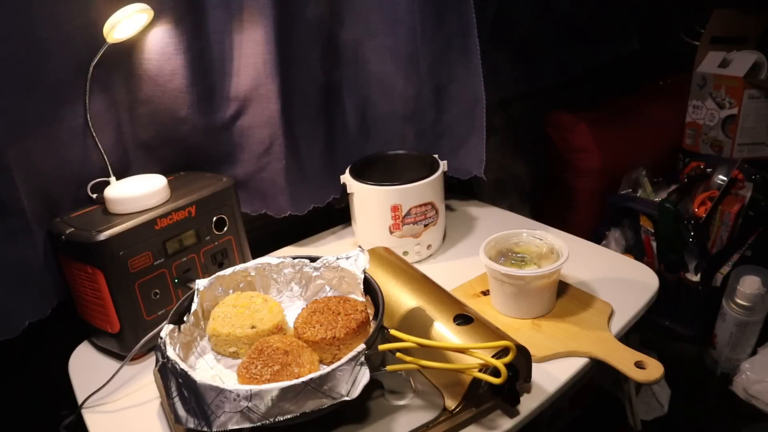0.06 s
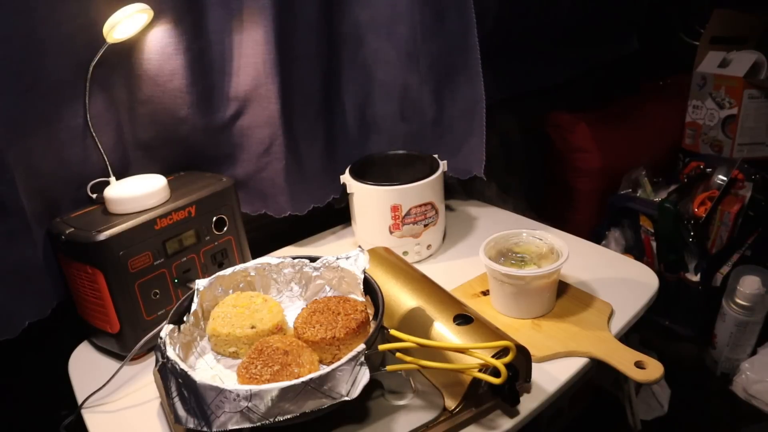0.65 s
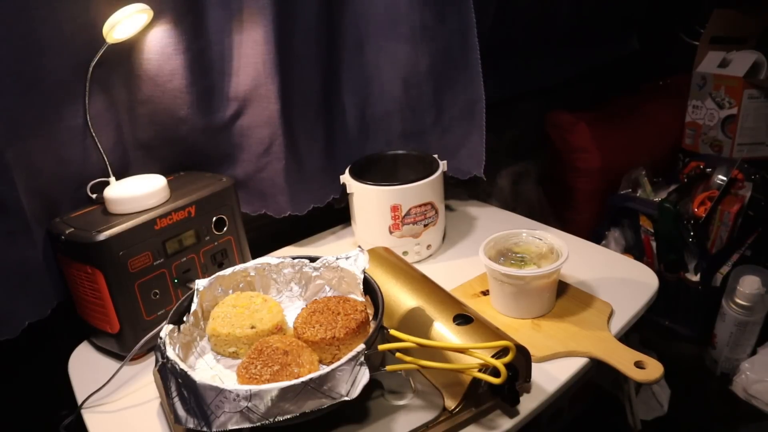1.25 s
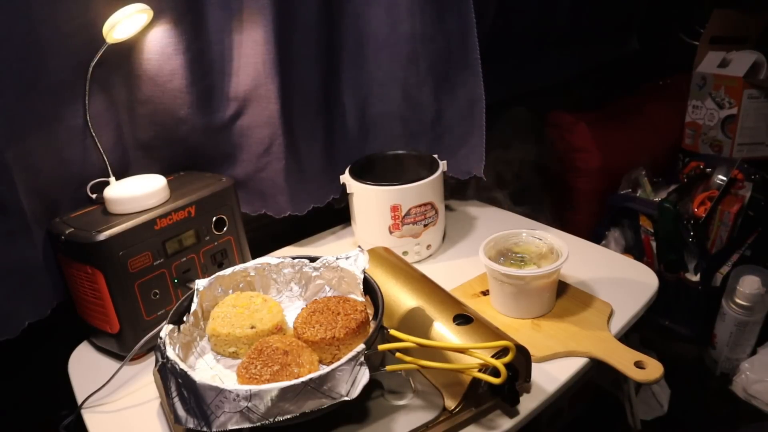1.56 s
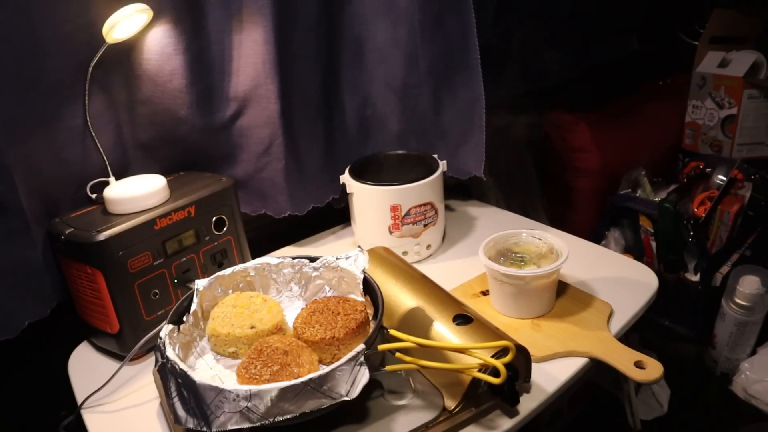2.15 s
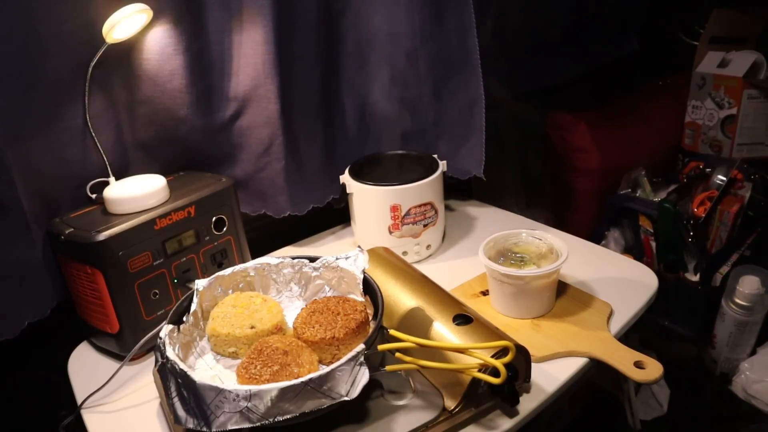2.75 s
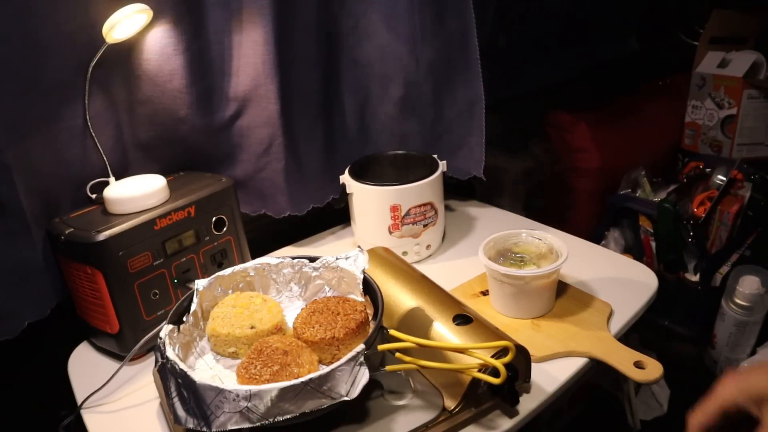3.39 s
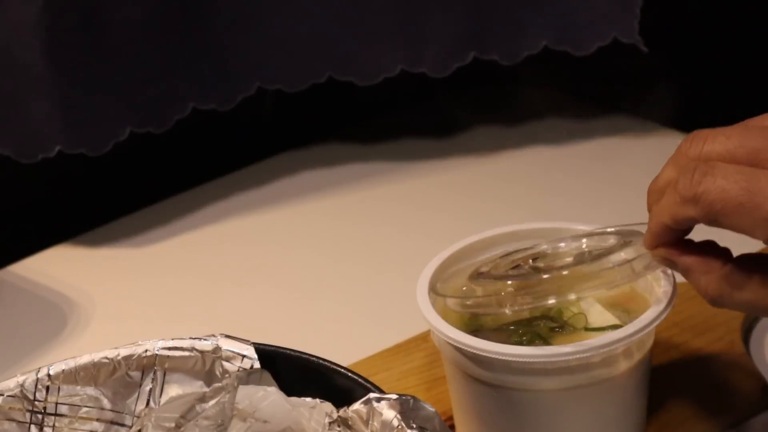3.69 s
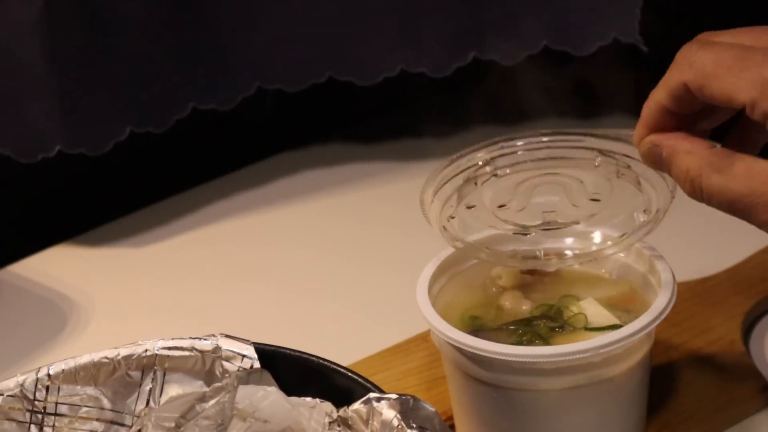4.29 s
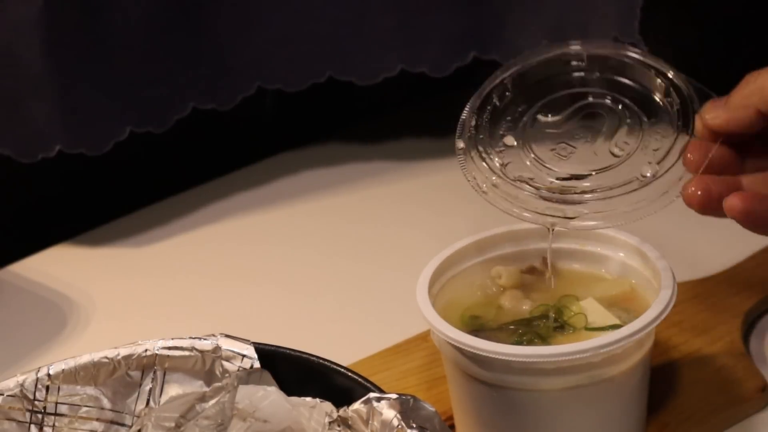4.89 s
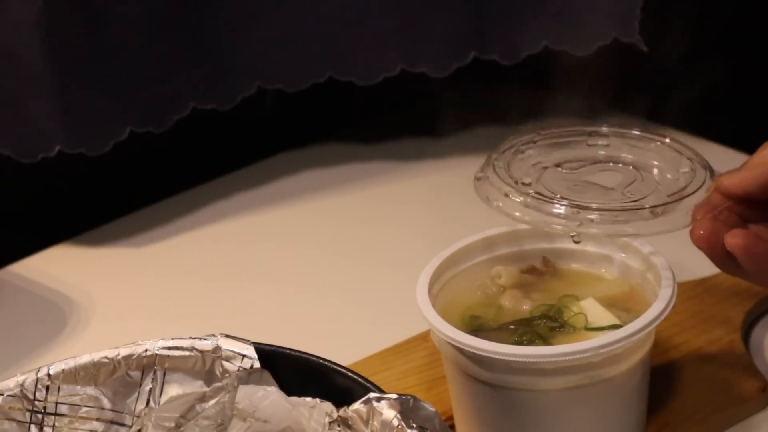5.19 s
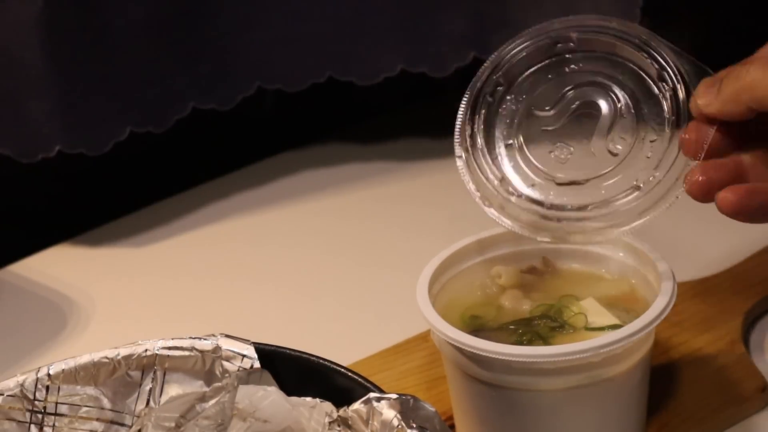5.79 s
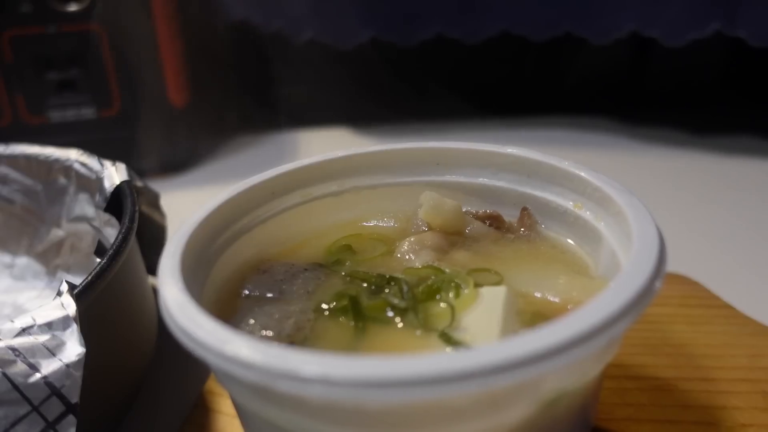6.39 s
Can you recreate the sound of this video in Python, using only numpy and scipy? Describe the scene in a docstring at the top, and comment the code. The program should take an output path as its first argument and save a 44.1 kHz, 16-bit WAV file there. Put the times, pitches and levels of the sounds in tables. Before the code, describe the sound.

A heater fan rumbles low and steady in a small padded camper cabin. Thin wrapping gives a brief crinkle at about 0.2 seconds, and a very faint, high whistle wavers in and out between 0.8 and 1.6 seconds. From 1.3 to 2.4 seconds the wrapping slides and crinkles with small bright ticks, and at 1.6 seconds something hollow knocks, a little to the right. At 3.5 seconds the fan cuts off abruptly, leaving soft hiss. Right away a thin plastic lid crackles as it is pried from a soup cup, and it crackles again at 3.9 seconds. At 4.5 seconds the lid flips with one sharp, close snap, by far the loudest sound, with a very short echo. A drop ticks faintly into the soup at 5 seconds. A hand brushes softly around 6.2 seconds, and the hiss turns much quieter at 6.4 seconds.

```python
"""Supper in a small camper cabin. First a heater fan rumbles while thin wrapping crinkles, a faint high whistle
comes and goes, and something hollow knocks. At 3.5 s the rumble is abruptly gone, and a plastic lid is pried
off a soup cup: its rim slips in two crackles, then its dome flips with one loud snap that makes a limiter turn
the sound down. A drop ticks into the soup, a hand brushes softly as it takes the lid aside, and for the last
moment the room's hiss is much quieter."""
import sys
import numpy as np
from scipy import signal
from scipy.fft import rfft, irfft
from scipy.io import wavfile
from scipy.ndimage import uniform_filter1d, minimum_filter1d

SR = 44100
rng = np.random.default_rng(int(sys.argv[2]) if len(sys.argv) > 2 else 0)


def unload_audio(sound):
    """Save the sound as a 16-bit wav file, at the path given as the first command line argument."""
    columns = np.transpose(np.atleast_2d(sound))
    # keep every value between -1 and 1, then stretch to whole-number steps
    steps = np.round(np.clip(columns, -1, 1) * 32767)
    wavfile.write(sys.argv[1], SR, steps.astype(np.int16))


N = 293088
RING = 13230  # samples in one short sound (0.3 s)
TIME = np.arange(N) / SR
AGE = TIME[:RING]  # seconds since a short sound began

# The lid's modes, the tones it rings with. Each row: pitch in Hz, level in dB, seconds to fade by 60 dB.
LID_MODES = [(756, -18.5, .105), (920, -22, .05), (1080, -21, .05), (1388, 2.5, .042), (1540, -13, .046),
             (1700, -7, .065), (1970, -13, .095), (2100, -4.5, .062), (2216, -1, .054), (2514, -10, .054),
             (2595, -14, .06), (2790, -8, .05), (3155, -12, .06), (3460, -12, .05), (3906, -3, .04),
             (4085, -6, .036), (4153, -.5, .04), (4545, -5, .038), (4761, -3, .038), (4908, 2.5, .04),
             (4992, -.5, .04), (5085, 0, .04), (5298, -2, .04), (6129, 0, .038), (6929, -1, .034),
             (7400, -4, .03), (7800, -3, .028), (8560, 0, .028), (8699, 2, .03), (9168, -1, .033),
             (9750, -4, .03), (10700, -6, .028)]
BUILD_CYCLES = 3  # vibrations that a mode of the plastic takes to build up
BURST_FADE_S = .014  # how fast the first burst of a crack dies away


def undb(db):
    """Turn decibels into a factor to multiply by."""
    return 10 ** (np.asarray(db) / 20)


def unit(x):
    """Scale a signal to an average (rms) level of 1."""
    return x / np.sqrt(np.mean(x ** 2))


def fade(fade_s):
    """A struck thing dies away, by 60 dB in `fade_s` seconds."""
    return np.exp(-np.log(1000) * AGE / max(fade_s, 1e-3))


def swell(rise_s):
    """A smooth start that takes `rise_s` seconds."""
    return np.sin(np.pi / 2 * np.minimum(AGE / max(rise_s, 1e-5), 1)) ** 2


def wobble(samples):
    """A random wavering: noise smoothed over so many samples."""
    return unit(uniform_filter1d(rng.standard_normal(N), size=samples))


def noise(colour, size, resonances=()):
    """Noise with a colour (how strong it is at each frequency), lifted or dipped at resonances."""
    hz = np.maximum(np.fft.rfftfreq(size, 1 / SR), 1)
    points, levels = np.transpose(colour)
    db = np.interp(np.log(hz), np.log(points), levels)
    for centre, width, lift in resonances:
        db = db + lift / (1 + (2 * (hz - centre) / width) ** 2)
    return unit(irfft(rfft(rng.standard_normal(size)) * undb(db), size))


def stereo(mid, side):
    """Left and right from a part they share (mid) and a part that is opposite in each (side)."""
    return np.array([mid + side, mid - side])


def wide(colour, size, side_db):
    """Stereo noise, as scattered by near walls; a low `side_db` makes both ears alike."""
    return unit(stereo(noise(colour, size), undb(side_db) * noise(colour, size)))


def pan(x, left_db):
    """Lean a sound to the left, or to the right if `left_db` is negative."""
    return x * undb(np.array([[left_db], [-left_db]]) / 2)


def ring(modes, spread, apart, scatter_db, cycles=0, stretch=1):
    """Fading tones that build up over some `cycles`, their pitches multiplied by `stretch`."""
    out = np.zeros((2, RING))
    for hz, db, fade_s in modes:
        # each tone reaches one ear `apart` radians early and the other as much late
        phase = spread * rng.standard_normal() + apart * rng.choice([-1, 1]) * np.array([[1], [-1]])
        gain = undb(db + scatter_db * rng.standard_normal((2, 1)))
        shape = swell(cycles / hz) * fade(fade_s)
        out += gain * shape * np.sin(2 * np.pi * hz * stretch * AGE + phase)
    return out


def tilt(x, slope_db):
    """Brighten or dull a short sound by so many dB an octave around 4 kHz."""
    octaves = np.log2(np.maximum(np.fft.rfftfreq(RING, 1 / SR), 1000) / 4000)
    return irfft(rfft(x) * undb(slope_db * octaves), RING)


def low_cut(x, hz):
    """Weaken the sound below `hz`: small things give off little bass."""
    return signal.sosfilt(signal.butter(2, hz, "highpass", fs=SR, output="sos"), x)


def add(out, start_s, sound):
    """Mix a short sound in at its start time."""
    start = int(start_s * SR)
    out[:, start:start + RING] += sound[:, :N - start]


def room_tone(quiet_from_s=6.362):
    """An even hiss that gives way to a much quieter one at the end."""
    # The hiss's mid and side parts, then the quieter hiss. Each row: frequency in Hz, level in dB.
    mid_colour = [(15, -40.5), (25, -2.5), (181, -2.5), (709, -6), (811, -7), (1350, -10), (1460, -11),
                  (2300, -12), (8780, -27.5), (12400, -35.5), (15000, -60.5)]
    side_colour = [(15, -52.5), (25, -35), (80, -20.5), (186, -5.5), (271, -6), (318, 0), (415, -11.5),
                   (450, -3), (856, -5), (1500, -7.5), (4260, -14.5), (11500, -29), (15000, -39.5)]
    quiet_colour = [(59, -63), (100, -30), (362, -13), (457, 4), (640, -6), (1340, 1.5), (1520, -3),
                    (2000, 0), (2320, -4), (8580, -17), (10200, -16), (10800, -18), (12600, -21),
                    (15500, -19)]
    hiss = stereo(undb(-55) * noise(mid_colour, N), undb(-50.5) * noise(side_colour, N))
    quiet = undb(-66) * wide(quiet_colour, N, side_db=1)
    return np.where(TIME < quiet_from_s, hiss, quiet)


def fan(cut_s=3.502):
    """Swirling air booms in the heater duct, alike in both ears, with a spread-out rush around it."""
    # The boom and the rush of the air. Each row: frequency in Hz, level in dB.
    boom_colour = [(25, -24), (55, -23), (88, -13), (118, -19), (155, -2.5), (190, 0), (250, -7),
                   (380, -21), (620, -30), (950, -25.5), (1500, -36.5), (2600, -36.5), (5000, -42),
                   (12000, -84)]
    rush_colour = [(40, -34), (180, 12), (330, 11), (700, 5), (1400, -1), (3800, .5), (7000, -8),
                   (11000, -13.5), (15000, -47)]
    # Resonances of the duct and cabin. Each row: centre in Hz, width in Hz, lift in dB.
    resonances = [(174, 59, 1), (320.2, 15.7, 13), (449, 42, -7.5), (567, 210, 15.5), (803, 8.2, 12.5),
                  (1308, 94, 10.5), (1450, 114, 10.5), (1600, 50, 8), (1990, 305, 12), (2560, 22, 13),
                  (3385, 17, 15)]
    boom = undb(-39.5) * noise(boom_colour, N, resonances)
    rush = undb(-54.5) * noise(rush_colour, N, resonances[5:])
    heard = np.clip((cut_s - TIME) / .0044, 0, 1)
    return stereo(boom, rush) * heard


def whistle(waver_share=.005, flicker_db=3.5):
    """A faint, rough tone near the top of hearing that wanders up and down and comes and goes."""
    # The path of the whistle. Each row: time in seconds, pitch in Hz, level in dB.
    path = [(.825, 10400, -90), (.845, 11200, -68), (.865, 11680, -68), (.9, 11500, -71),
            (.937, 11020, -70), (.975, 12350, -78), (1.005, 11500, -83), (1.035, 10880, -76),
            (1.075, 11250, -77), (1.1, 11150, -95), (1.17, 10900, -95), (1.205, 11400, -76),
            (1.27, 10500, -80), (1.32, 10600, -100), (1.505, 11100, -100), (1.535, 11620, -69),
            (1.56, 11900, -90)]
    times, pitches, levels = np.transpose(path)
    hz = np.interp(TIME, times, pitches) * (1 + waver_share * wobble(60))
    gain = np.interp(TIME, times, undb(levels), left=0, right=0) * undb(flicker_db * wobble(60))
    return gain * np.sin(2 * np.pi * np.cumsum(hz) / SR)


def brushes():
    """Soft, dull rubs of the hand that takes the lid aside."""
    # The rubs. Each row: start in seconds, level in dB, rise in seconds, fade in seconds.
    rubs = [(6.122, -51, .02, 0.14), (6.146, -47, .012, 0.074), (6.215, -43, 0.025, 0.16),
            (6.25, -45.5, 0.014, 0.12)]
    # Their dull noise. Each row: frequency in Hz, level in dB.
    rub_colour = [(200, -22), (600, -16), (800, -11), (910, 0), (1020, -4), (1150, -13), (1350, -12),
                  (3500, -24), (6000, -37), (12000, -52)]
    out = np.zeros((2, N))
    for start_s, db, rise_s, fade_s in rubs:
        add(out, start_s, undb(db) * swell(rise_s) * fade(fade_s) * wide(rub_colour, RING, side_db=-10))
    return out


def drip(start_s=5.041):
    """A drop falls from the wet lid into the soup with a faint tick."""
    # The tick of the drop. Each row: frequency in Hz, level in dB.
    tick_colour = [(1000, -25), (2400, -12), (2900, 0), (3600, -1), (4300, -15), (9000, -18), (14000, -35)]
    out = np.zeros((2, N))
    add(out, start_s, undb(-49) * swell(.002) * fade(.06) * wide(tick_colour, RING, side_db=-1))
    return out


def wrapping(swell_db=13, release_share=.9, grain_db=2.2, tick_rise_s=.0021, tick_fade_s=.071):
    """Thin wrapping slides in strokes with a grainy hiss, and its creases give way in bright ticks."""
    # Sliding strokes. Each row: fastest moment in seconds, level in dB, seconds to grow by swell_db.
    strokes = [(1.344, -44.5, 0.021), (1.401, -39.5, 0.024), (1.655, -47.5, 0.033), (1.73, -41, 0.077),
               (1.88, -48.5, 0.14), (2.037, -41, 0.036), (2.112, -43.5, 0.07), (2.48, -57.5, 0.18),
               (2.92, -63.5, 1)]
    # Creases giving way. Each row: start in seconds, level in dB.
    creases = [(.171, -32), (0.1776, -37.5), (.4804, -51.5), (1.668, -46), (1.713, -43), (1.731, -42),
               (1.755, -41.5), (1.831, -46), (1.841, -40), (1.966, -38.5), (2.002, -39), (2.025, -44),
               (2.047, -33.5), (2.09, -42), (2.108, -46), (2.145, -44), (2.181, -52), (2.39, -33.5),
               (2.824, -50)]
    # The noise of the sheet. Each row: frequency in Hz, level in dB.
    sheet_colour = [(500, -8), (1500, -0.5), (3000, -3), (5000, 0), (7500, -5), (11000, -0.5),
                    (13000, -9.5), (15500, -22.5)]
    power = np.zeros(N)
    for peak_s, db, build_s in strokes:
        from_peak = np.maximum(peak_s - TIME, (TIME - peak_s) / release_share) / build_s
        power += undb(db - swell_db * from_peak) ** 2
    flutter = undb(grain_db * wobble(260))  # the sheet catches and slips
    out = wide(sheet_colour, N, side_db=6.5) * np.sqrt(power) * flutter
    # a tick starts to fall only once the crease has given way
    fall = fade(tick_fade_s)
    shape = swell(tick_rise_s) * np.minimum(fall / np.interp(tick_rise_s, AGE, fall), 1)
    for start_s, db in creases:
        add(out, start_s, undb(db) * shape * wide(sheet_colour, RING, side_db=6.5))
    return pan(out, left_db=-1.5)


def knock(left_lag_s=.00023):
    """A hollow knock and its softer rebound, off to the right: later and weaker in the left ear."""
    # The two hits. Each row: start in seconds, level in dB, treble tilt in dB per octave.
    hits = [(1.6392, -18.8, -0.2), (1.6503, -26.5, -1.2)]
    # The tones of the hollow thing. Each row: pitch in Hz, level in dB, fade in seconds.
    hollow_modes = [(162, -19, .06), (282, -7.5, .06), (410, -7, .08), (460, -9, .075), (537, 1.5, .068),
                    (640, -4, .042), (783, -9, .06), (847, -11, .07), (1080, -14, .06), (1200, -13, .06),
                    (1420, -10, .05), (1585, -9.5, .062), (1810, -17, .05), (2425, -25, .05),
                    (3750, -17, .03), (4750, -20, .025)]
    # The thud of a hit. Each row: frequency in Hz, level in dB.
    thud_colour = [(120, -22), (270, -11.5), (600, 7.5), (900, -7), (1700, 5), (2800, -14.5), (4800, -18),
                   (8000, -34)]
    out = np.zeros((2, N))
    for start_s, db, slope_db in hits:
        thud = undb(-10.5) * wide(thud_colour, RING, side_db=-4) * fade(.06)
        tones = ring(hollow_modes, spread=.25, apart=.2, scatter_db=0)
        add(out, start_s, undb(db) * tilt(swell(.001) * (tones + thud), slope_db))
    left, right = low_cut(out, hz=85)
    late_left = np.interp(TIME - left_lag_s, TIME, left)
    return pan(np.array([late_left, right]), left_db=-5)


def cabin_echo():
    """The padded cabin's short, dull answer to a crack."""
    # The echo's noise. Each row: frequency in Hz, level in dB.
    echo_colour = [(300, -22), (900, -12), (1500, -3), (2100, 0), (3400, -6), (5000, -6), (9000, -13),
                   (15000, -32)]
    return undb(-22) * wide(echo_colour, RING, side_db=1) * fade(.11)


def prying(bend_share=.005):
    """Each slip of the lid's rim cracks the thin plastic and sets the cup and the lid ringing."""
    # The rim slips and buckles. Each row: start in seconds, level in dB, the cup's and then the lid's
    # ringing in dB relative to the crack, treble tilt in dB per octave.
    slips = [(3.5213, -29.5, -4.5, -20, -.5), (3.5248, -31.5, -3, -18, -3), (3.5294, -27.5, -4, -18, -3),
             (3.5313, -30.5, -1.5, -22, -2), (3.5352, -35, 2, -12, -3), (3.5592, -49, -20, -20, 0.5),
             (3.9014, -32, -11, -12.5, 1.5), (3.9046, -32, -9.5, -10, -0.5), (3.908, -42, -2, -3, -3),
             (4.029, -53.5, -6, -9.5, -8.5), (5.5794, -57, -35, -15, -4)]
    # The crack of the rim against the cup. Each row: frequency in Hz, level in dB.
    crack_colour = [(200, -30), (600, -11), (1050, -17), (1400, -9), (2500, -4), (4500, -4), (5100, 1),
                    (6000, -2), (8200, 2), (9100, -3), (10900, 1), (12500, -10), (15500, -28)]
    # The tones of the cup with its lid on. Each row: pitch in Hz, level in dB, fade in seconds.
    cup_modes = [(590, -13, .035), (730, -10, .045), (785, -12, .045), (1270, -17, .045), (1384, -4, .062),
                 (1890, -7, .06), (1970, -5, .075), (2230, -10, .04), (2440, -10, .04), (2660, -4.5, .05),
                 (2804, -10, .045), (3090, -10, .05), (3454, -6, .04), (3915, -6, .035), (4205, -6, .035),
                 (4500, -9, .04), (4866, -3, .04), (4980, -3, .038), (5436, -5, .036), (6970, -4, .035),
                 (7403, -4, .035), (7876, -4, .035), (8300, -4, .035)]
    out = np.zeros((2, N))
    for start_s, db, cup_db, lid_db, slope_db in slips:
        stretch = 1 + bend_share * rng.standard_normal()  # bending shifts the pitches at each slip
        crack = wide(crack_colour, RING, side_db=1) * (fade(.042) + undb(-3) * fade(BURST_FADE_S))
        cup = ring(cup_modes, spread=1.2, apart=.68, scatter_db=.6, cycles=BUILD_CYCLES, stretch=stretch)
        lid = ring(LID_MODES, spread=1.2, apart=.68, scatter_db=.6, cycles=BUILD_CYCLES, stretch=stretch)
        sound = crack + undb(cup_db) * cup + undb(lid_db) * lid + cabin_echo()
        add(out, start_s, undb(db) * tilt(sound * swell(.0009), slope_db))
    return low_cut(out, hz=480)


def snap(start_s=4.4888, level_db=-4.7, wall_lag_s=.005):
    """The freed lid flips its dome: a bright burst, ringing, a faint thud and a slap off a near wall."""
    # The first burst, the lid's crowded high tones (too close to tell apart) and the air that the dome
    # pushes. Each row: frequency in Hz, level in dB.
    burst_colour = [(500, -34), (2500, -18), (4100, -6), (5000, -2), (6200, 0), (7000, 1.5), (8000, 0),
                    (8800, 4), (10400, -1), (11800, -13), (15000, -33)]
    crack_colour = [(100, -34), (620, -34), (900, -24), (1200, -25), (1400, -11), (2200, -5), (3400, -10),
                    (4900, 0), (7000, -1), (9000, -1), (10800, -3), (13000, -16), (15500, -32)]
    thud_colour = [(40, -8), (120, -4), (300, 0), (450, -4), (700, -12), (2000, -40)]
    burst = undb(6) * wide(burst_colour, RING, side_db=-5) * fade(BURST_FADE_S)
    crack = wide(crack_colour, RING, side_db=2) * fade(.05)
    tones = ring(LID_MODES, spread=1.3, apart=.68, scatter_db=.6, cycles=BUILD_CYCLES)
    lid = undb(-4.2) * pan(tones, left_db=-2.5)
    thud = undb(-33) * wide(thud_colour, RING, side_db=-8) * fade(.06)
    slap = undb(-2.5) * wide(burst_colour, RING, side_db=8) * fade(.03)
    onset = swell(.0011)
    plastic = low_cut((burst + crack + lid + cabin_echo()) * onset, hz=480)
    out = np.zeros((2, N))
    add(out, start_s, plastic + thud * onset)
    add(out, start_s + wall_lag_s, slap * onset)
    return undb(level_db) * out


def scene():
    """Everything that sounds in the cabin."""
    return fan() + room_tone() + prying() + snap() + drip() + wrapping() + knock() + brushes() + whistle()


def limiter(x, ceiling_db, attack_s, release_db_per_s):
    """Turn the sound down when its level passes the ceiling, then let it come back steadily."""
    memory = np.exp(-1 / (attack_s * SR))
    power = signal.lfilter([1 - memory], [1, -memory], np.mean(x ** 2, axis=0))
    over_db = np.maximum(10 * np.log10(power + 1e-18) - ceiling_db, 0)
    recovery_db = release_db_per_s * TIME
    cut_db = np.maximum.accumulate(over_db + recovery_db) - recovery_db
    return x * undb(-cut_db)


def record(dry, max_peak=.98, top_hz=15200):
    """A limiter dips the level at the snap and looks ahead to tame its peaks; the top treble is cut."""
    limited = limiter(dry, ceiling_db=-7.5, attack_s=.0026, release_db_per_s=8)
    safe_gain = max_peak / np.maximum(np.abs(limited), max_peak)
    smooth_gain = uniform_filter1d(minimum_filter1d(safe_gain, size=25), size=25)
    treble_cut = signal.ellip(8, .2, 70, top_hz, fs=SR, output="sos")
    return signal.sosfilt(treble_cut, limited * smooth_gain)


dry = scene()
out = record(dry)
unload_audio(out)
```